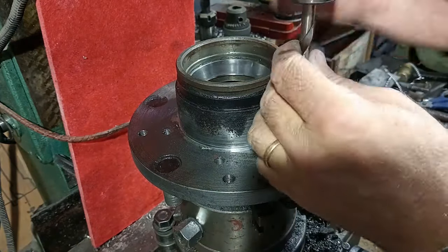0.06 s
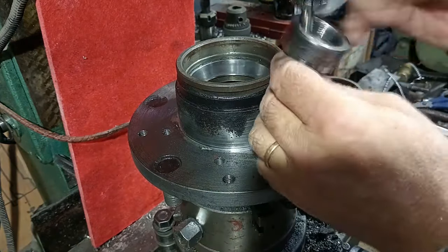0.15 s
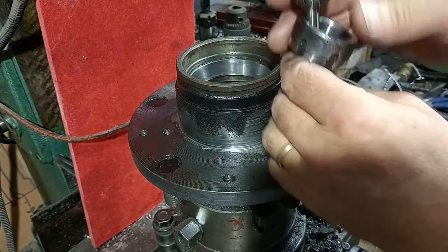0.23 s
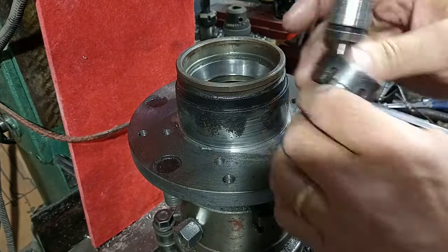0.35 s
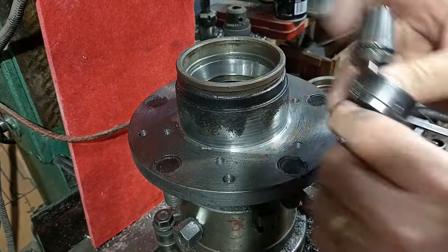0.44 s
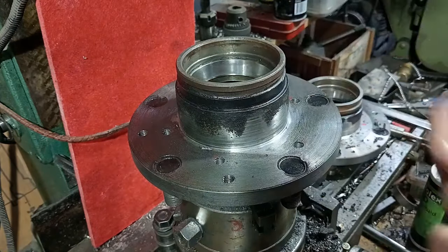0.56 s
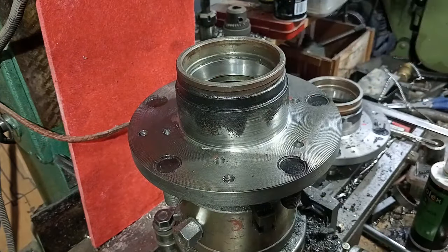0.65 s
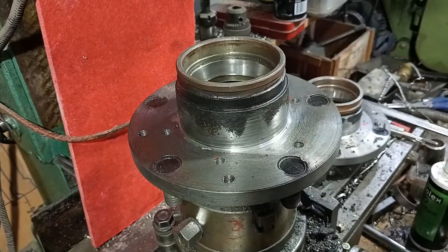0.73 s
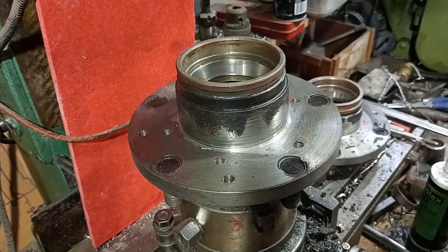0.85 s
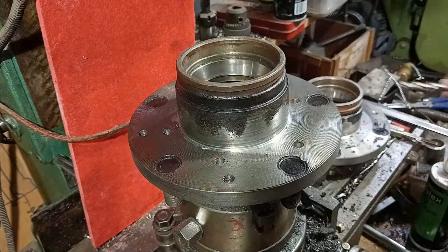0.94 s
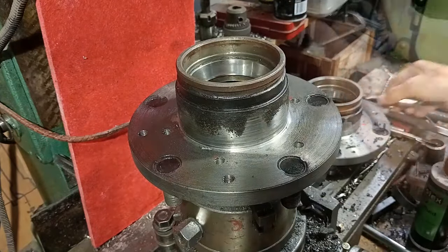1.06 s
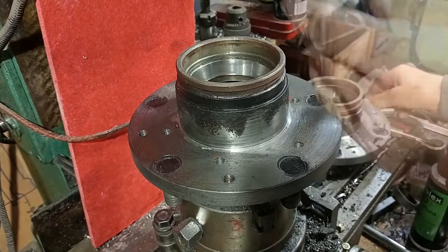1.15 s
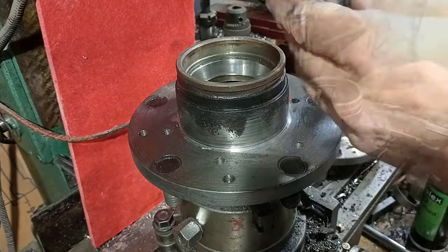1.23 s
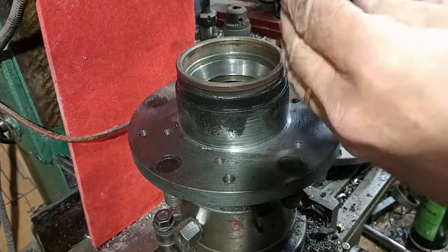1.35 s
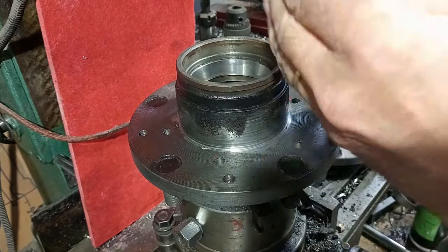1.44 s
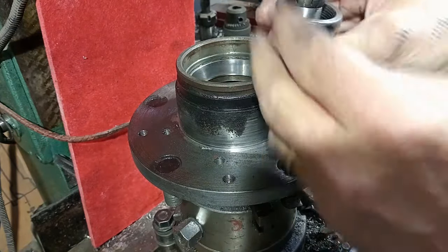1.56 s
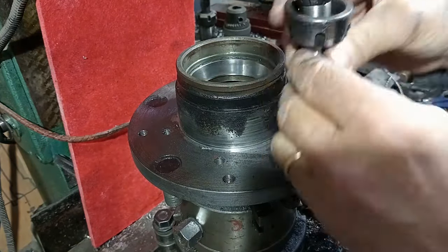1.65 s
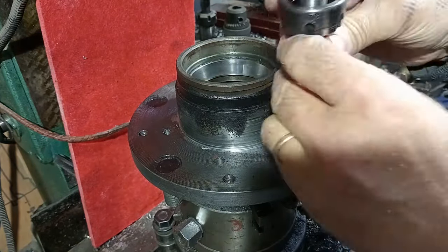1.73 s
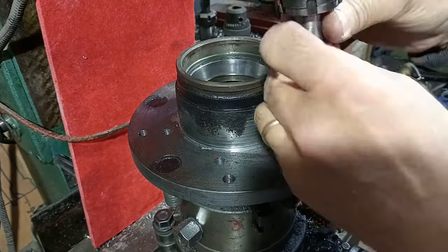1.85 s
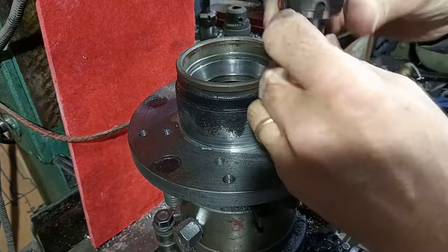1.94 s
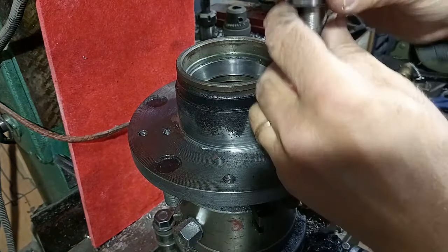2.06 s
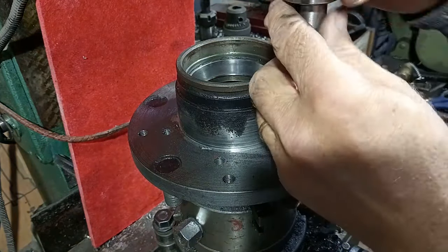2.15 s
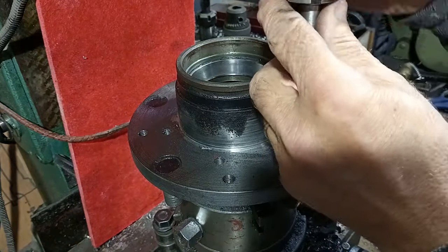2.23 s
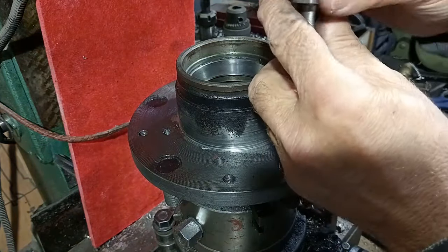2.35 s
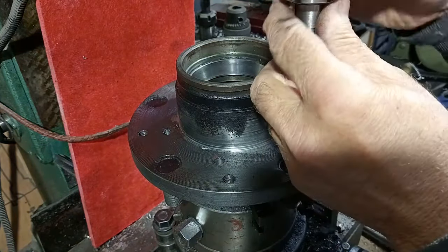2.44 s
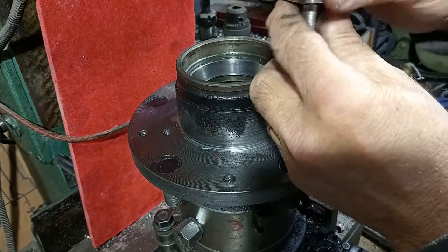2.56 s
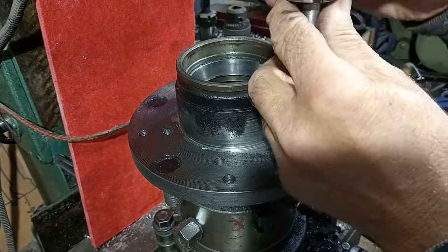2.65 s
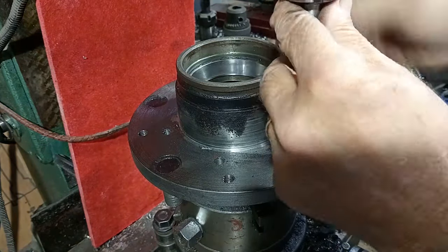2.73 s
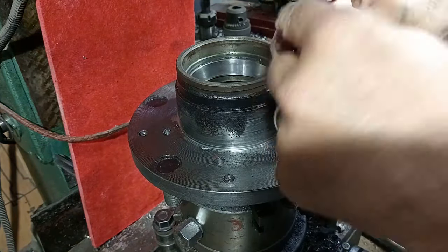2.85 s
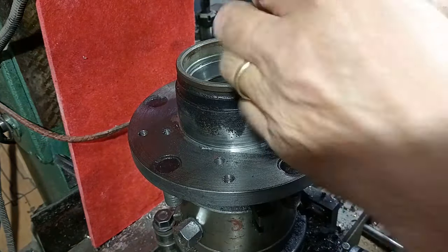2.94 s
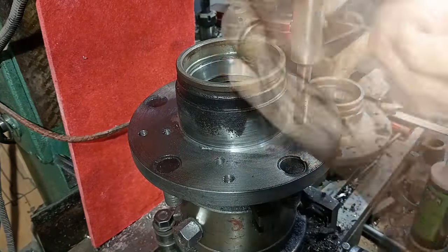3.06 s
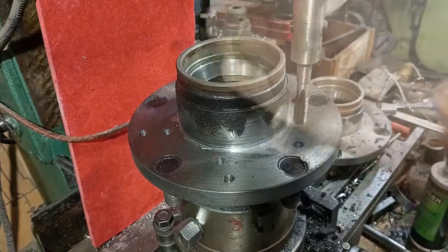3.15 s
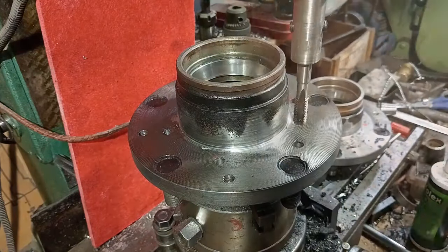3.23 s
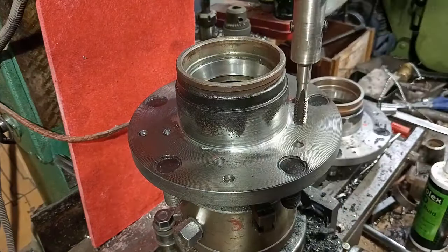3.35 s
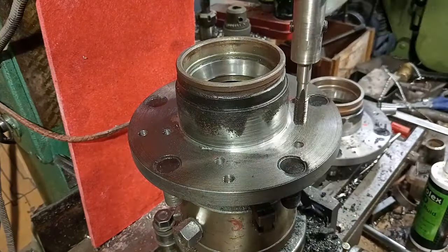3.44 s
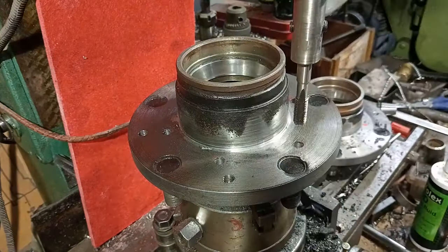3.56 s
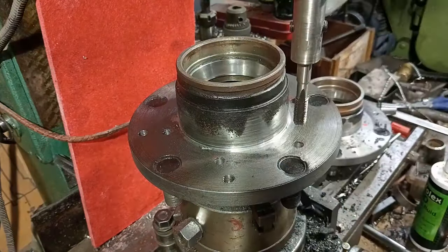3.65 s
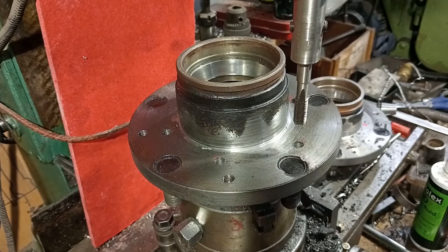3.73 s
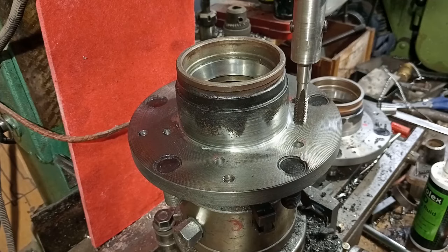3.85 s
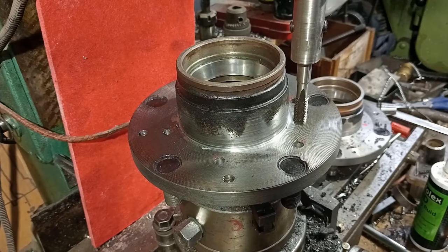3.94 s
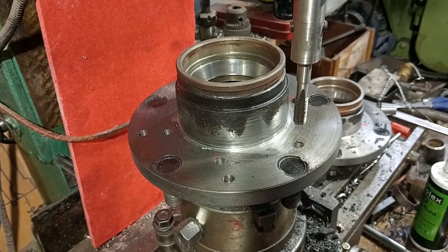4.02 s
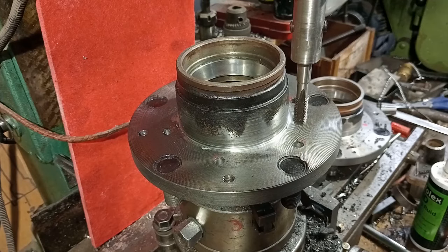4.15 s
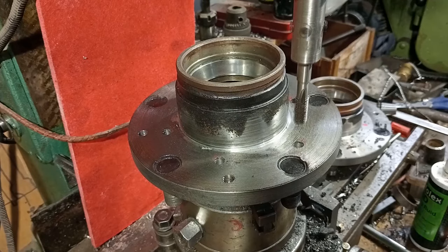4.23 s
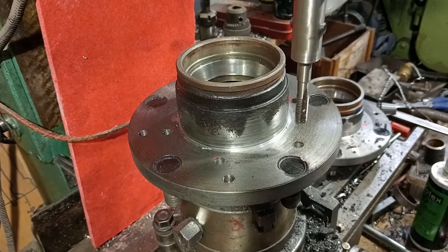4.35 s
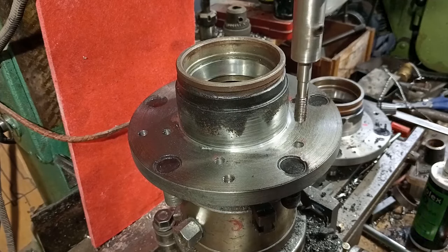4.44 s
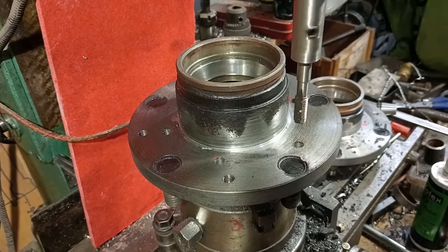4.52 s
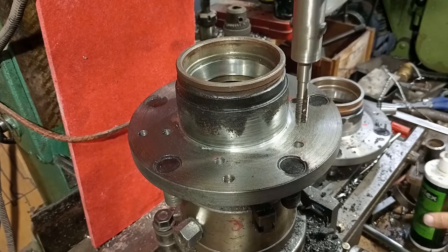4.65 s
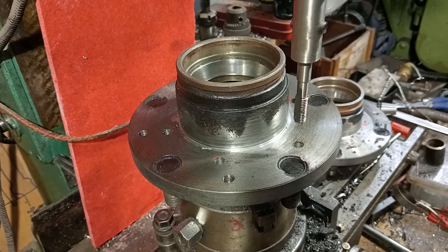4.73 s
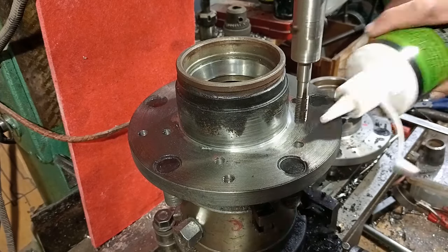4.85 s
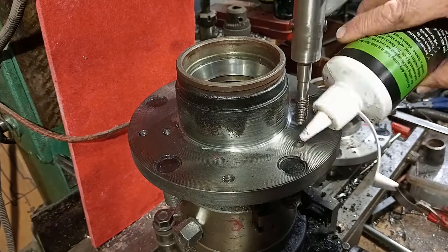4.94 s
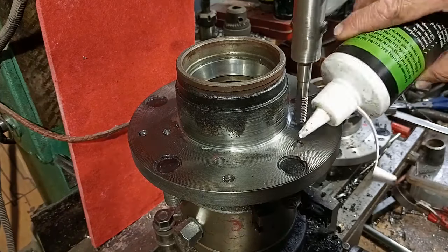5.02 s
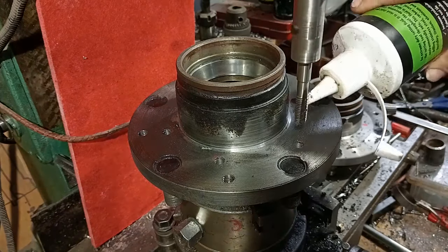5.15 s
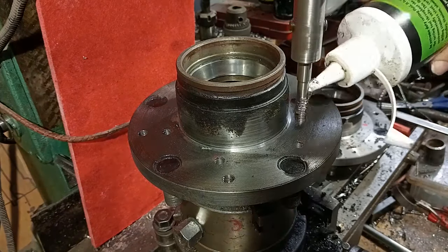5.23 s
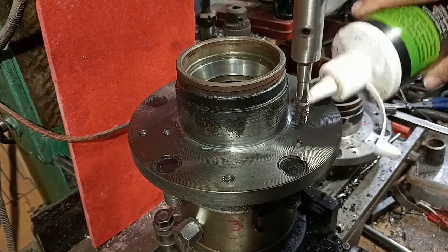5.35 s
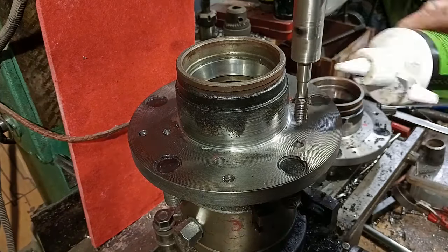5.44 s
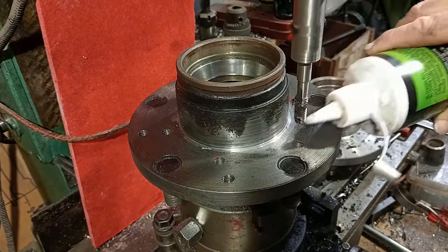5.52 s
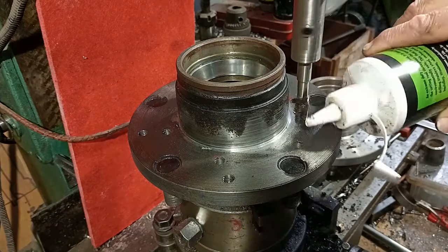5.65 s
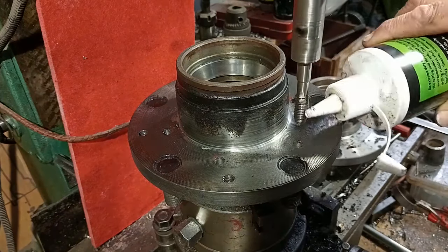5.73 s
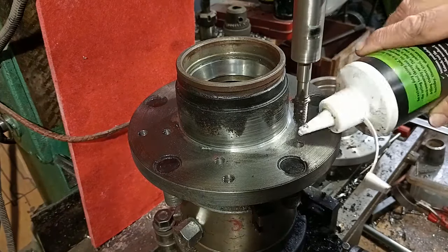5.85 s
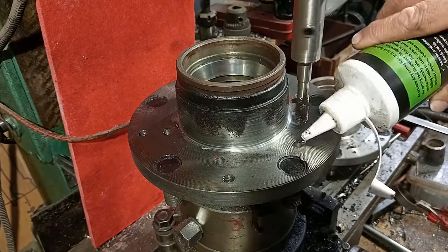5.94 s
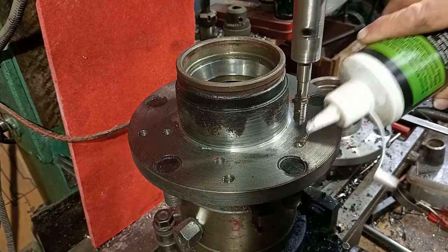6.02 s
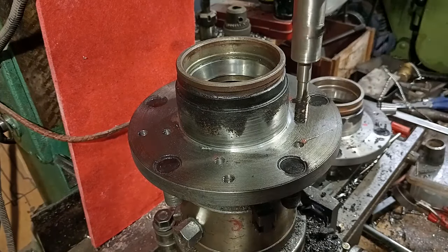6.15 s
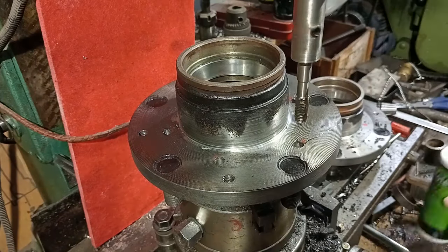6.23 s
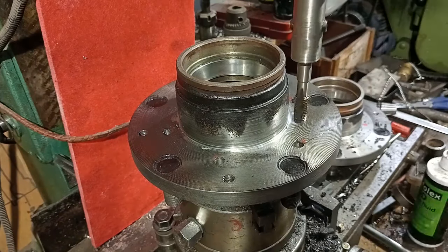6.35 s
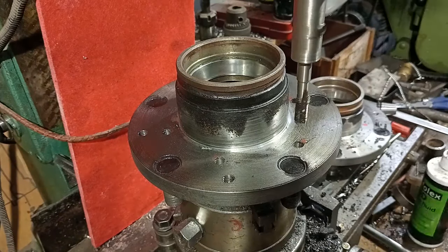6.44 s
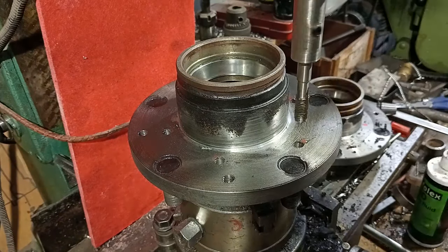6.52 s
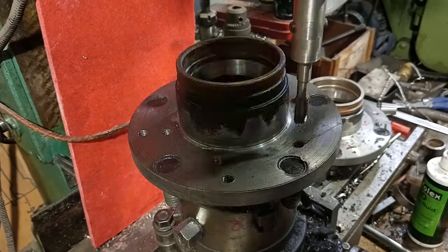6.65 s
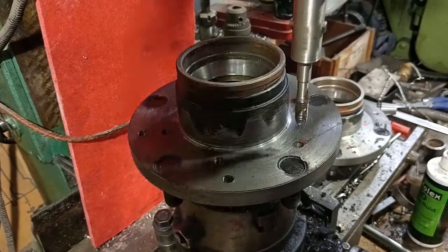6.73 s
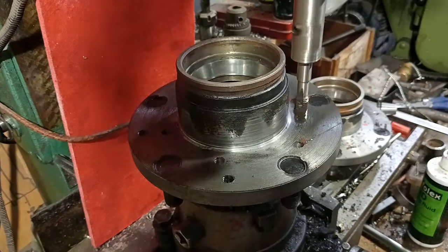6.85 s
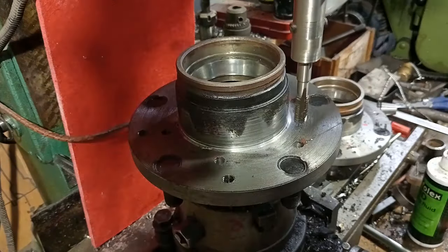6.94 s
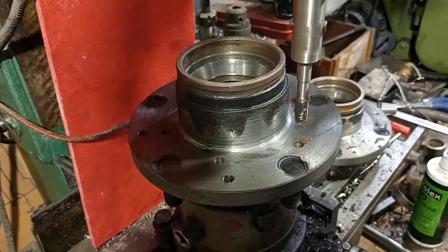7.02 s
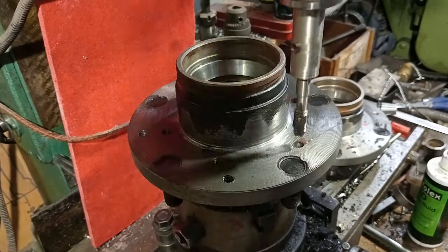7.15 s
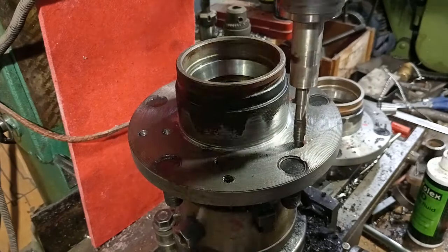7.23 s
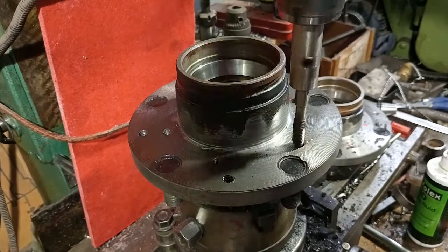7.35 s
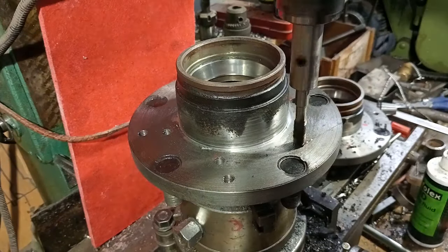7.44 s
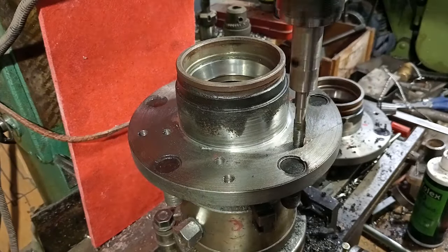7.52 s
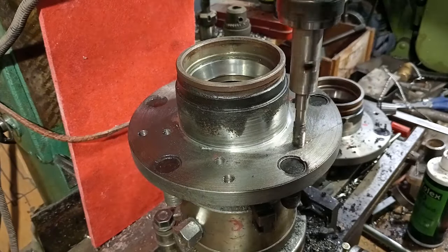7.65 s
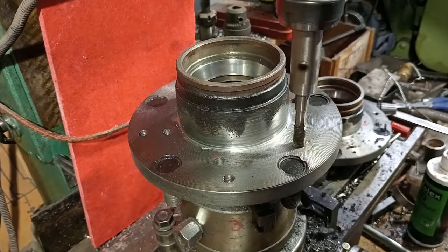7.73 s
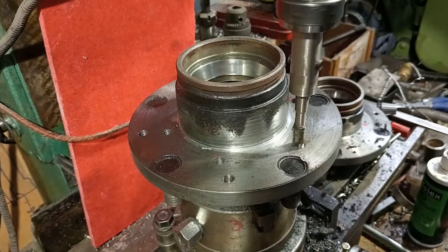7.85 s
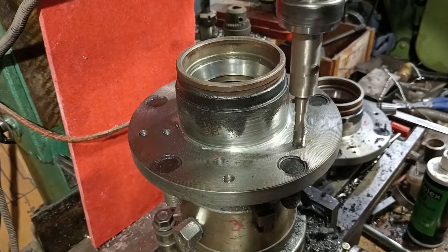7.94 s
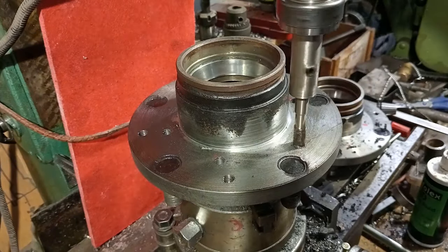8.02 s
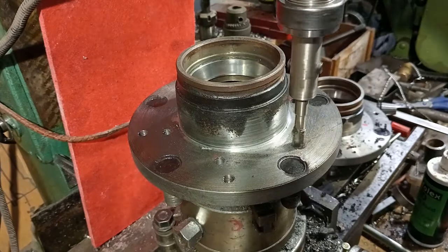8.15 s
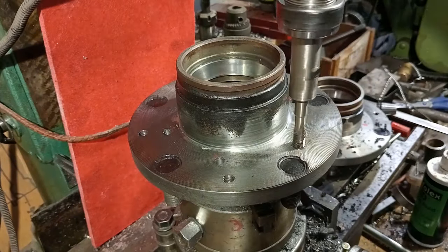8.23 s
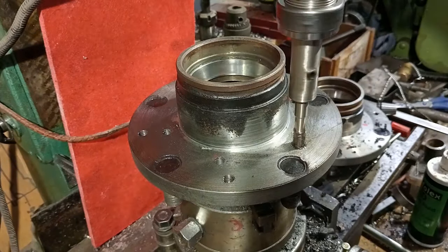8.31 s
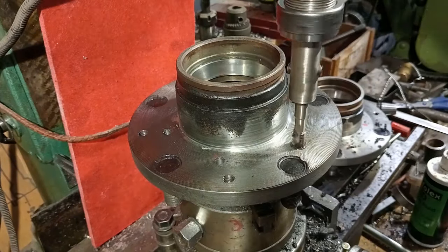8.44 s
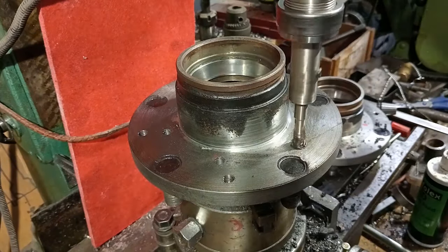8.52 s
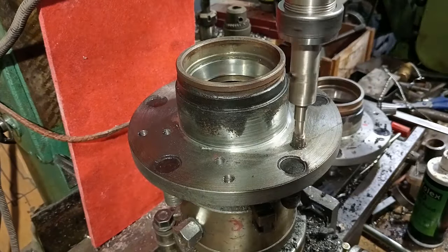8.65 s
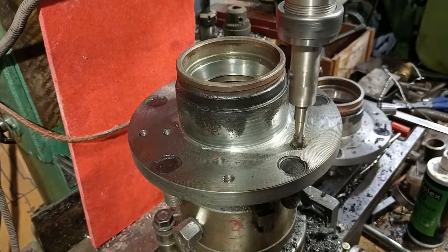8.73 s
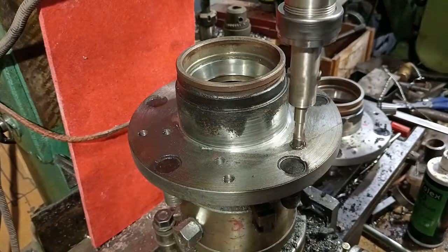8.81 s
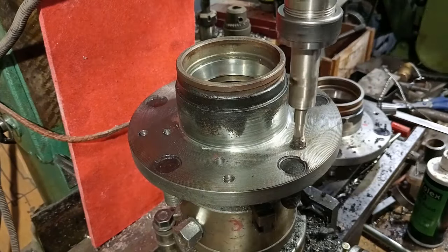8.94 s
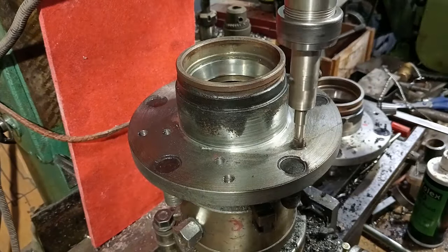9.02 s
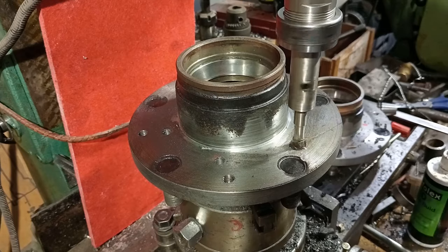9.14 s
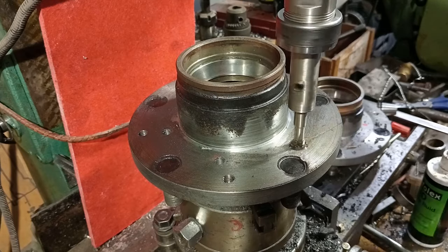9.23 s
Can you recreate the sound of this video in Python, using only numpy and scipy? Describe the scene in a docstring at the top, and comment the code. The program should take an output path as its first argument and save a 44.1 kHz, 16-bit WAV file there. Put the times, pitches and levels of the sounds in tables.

```python
"""A mill-drill motor runs: mains hum, a rattle twice a mains cycle, gear tones and a high whine in housing hiss.
Lowering the quill changes the colour; then the tap bites and the speed sags a little.
Before that, hands fit the tap: steel parts click, the bench is bumped, fingers and sleeves rustle.
A contactor snaps between the two. Tones, bumps and the holder's ring are sines; the rest is mostly
shaped noise or pulses. Clicks, bumps and short narrow-band sounds leave a diffuse tail in the shop."""
import sys
import numpy as np
from scipy import signal
from scipy.io import wavfile
from scipy.ndimage import uniform_filter1d

SR = 44100
rng = np.random.default_rng(int(sys.argv[2]) if len(sys.argv) > 2 else 0)


def convert_level_to_amplitude(level_db):
    """Map a level in decibels to its linear amplitude factor."""
    exponent = np.asarray(level_db, float) / 20
    return 10 ** exponent


def int16_out(signal):
    """Quantize to a 16-bit WAV file."""
    q = np.round(np.clip(np.atleast_2d(signal).T, -1, 1) * 32767)
    wavfile.write(sys.argv[1], SR, q.astype(np.int16))


N = 409248

# Work stage, 0 quill up - 1 quill lowered - 2 cutting: t/s, stage
WORK_STAGE = [(6.66, 0.0046), (6.83, 0.3), (7.17, 1), (7.78, 1), (7.81, 2)]
# The contact closes, lets go once around the bounce, then holds
SWITCH_S, BOUNCE_S, BOUNCE_WIDTH_S, BOUNCE_DB = 4.345, 4.367, 0.011, -15
START = round(SWITCH_S * SR)

# In the tables below, "x3" is one column each for quill up, lowered, cutting.
MAINS_HZ = 50
# Hum partials: f/multiple of mains, level/dB x3
HUM_PARTIALS = [(8, -39, -39.5, -42), (8.45, -61, -61, -66), (10, -57, -57, -60), (16, -61, -60, -59),
                (22, -60, -60, -65), (24, -60, -59, -65), (26, -57, -57, -62), (28, -52, -52, -62),
                (30, -56, -56, -62), (32, -53, -55, -60)]
RATTLE_DB, HOUSING_DB = (-35.5, -36, -39.5), (-31, -31, -32.5)
BUZZ_SHARE, KNOCK_STRENGTH = (0.43, 0.58, 0.62), (0.28, 0.26, 0.78)
KNOCK_S, TURN_S = 8.151, .0455  # time of one knock, and the spacing of all
SAG = .0032  # share of speed lost in the cut
# Gearbox resonances: f/Hz, width/Hz (before body() widens it), relative level/dB x3
GEARBOX_MODES = [(748, 140, -16, -11, -7), (1126, 210, -12.5, -8, -11.5), (1405, 64, -4, -1.5, -5),
                 (1575, 76, -7, -2, -2.5), (1742, 83, 3, 7, -0.5), (1999, 118, -1, 6.5, 4),
                 (2300, 160, -2.5, 5, -1.5), (2700, 280, 0.5, 4.5, -1)]
# Housing resonances, same columns
HOUSING_MODES = [(3450, 500, -16, -15, -12), (4130, 200, -8, -10, -7), (4650, 170, -6, -10, -10),
                 (5000, 300, -3, -11, -11), (5250, 130, -13, -7, -9), (5800, 250, -8, -3, -5),
                 (6250, 280, 1, 0, -2), (6800, 300, -9, -12, -11), (7500, 300, -10, -9, -13),
                 (8050, 400, -5, -6, -7), (9000, 500, -14, -15, -16), (10150, 350, -10, -11, -9),
                 (10650, 400, -7, -11, -6), (11400, 350, -10, -11, -10), (12050, 450, -1, 0, -2),
                 (12650, 400, -5, -5, -7), (13250, 500, -1, -1, 0), (13950, 500, -8, -3, -7),
                 (14530, 500, -8, -3, -1), (15200, 550, -1, -3, -3), (15600, 400, -10, -9, -6)]
# Swells and slackenings of the running gear: middle t/s, width/s, rattle level/dB, share felt in the hiss
GEAR_SURGES = [(4.388, 0.03, 3.5, 0.95), (4.68, 0.24, -3.5, -0.15), (6.4, 0.18, -3.5, 0.002),
               (6.95, 0.12, 2.5, 0.34), (7.3, 0.41, 1.5, 0.3), (7.725, 0.013, 4.5, 0.86),
               (7.771, 0.013, 5.5, 1)]
# Gear mesh comb with sidebands: f/multiple of mesh, sideband number, level/dB x3
MESH_HZ, MESH_SIDE_HZ = 583.73, 99.4  # at free speed
MESH_TONES = [(6, 0, -57, -60, -66), (7, -1, -49, -61, -55), (7, 0, -46, -44, -46), (8, -1, -43, -59, -58),
              (8, 0, -46, -43, -47), (9, -1, -46, -50, -54), (9, 0, -53, -46, -53), (9, 1, -59, -47, -48),
              (10, -1, -51, -48, -51), (10, 1, -60, -49, -54), (10, 2, -57, -52, -57),
              (11, -1, -54, -46, -44)]
# High whine, evenly stepped around its centre: steps, sideband number, level/dB x3
WHINE_HZ, WHINE_STEP_HZ, WHINE_SIDE_HZ = 13274.9, 632.8, 115.7  # at free speed
WHINE_TONES = [(-2, 0, -43, -41, -46), (-2, 1, -51, -55, -54), (-2, 2, -51, -49, -50),
               (-1, -2, -52, -52, -56), (-1, 0, -43, -44, -46), (0, -2, -49, -45, -52),
               (0, 0, -42, -43, -43), (0, 1, -50, -52, -51), (1, 0, -51, -49, -53), (2, 0, -52, -50, -47)]
# Further single tones that follow the shaft speed: f/Hz at free speed, level/dB x3
SINGLE_TONES = [(3778, -55, -60, -58), (4611.6, -51, -57, -69), (4916.4, -51, -64, -62),
                (5285.9, -62, -51, -52), (5779, -66, -52, -57), (6185, -50, -56, -60),
                (6281.6, -58, -52, -53), (6480.2, -52, -56, -70), (7929.9, -45, -45, -52),
                (12584.6, -52, -53, -55), (14573.7, -59, -53, -50)]
TRAVEL_TONES_DB, TRAVEL_HISS_DB = -6, -2  # tones and hiss thin out while the quill travels
# The quill sliding in its bore: f/Hz, level/dB
QUILL_SLIDE = [(6000, -53), (6800, -45), (7800, -43)]
# Colour of the low rumble: f/Hz, relative level/dB per Hz
RUMBLE_COLOUR = [(12, -47), (43, -3), (86, -15.5), (145, -13), (338, -2), (364, -52), (398, -36), (455, 8),
                 (700, -4.5), (910, -67)]
RUMBLE_DB = (-62, -62, -63)

# Steel on steel, the contactor, last the tap meeting the hole:
# t/s, level/dB, centre f/Hz, lower body/dB against the crack
STEEL_CLICKS = [(0.0176, -25.5, 5140, -7), (0.1334, -24.5, 4500, -9), (0.1375, -29.5, 6460, -1),
                (0.1725, -19.5, 6240, -24.5), (0.1775, -33, 7450, -16.5), (0.1934, -32, 7500, -23),
                (0.1987, -27, 6000, -7), (0.209, -36, 6000, -21), (0.2186, -20.5, 6260, -21.5),
                (0.2235, -10.5, 11540, -11), (0.238, -26, 6200, -27.5), (0.267, -23.5, 6200, -33.5),
                (0.2857, -40, 5000, 7), (0.3345, -22, 5950, -12), (0.5675, -36, 9800, -28),
                (0.5853, -37, 9400, -30), (0.818, -26, 9000, -59), (0.842, -33, 8550, -10.5),
                (1.201, -60, 4000, -14), (1.2232, -38, 8000, -22), (1.2282, -30, 7700, -7.5),
                (1.295, -60, 8000, -25), (1.345, -42, 7250, -17), (1.3557, -26, 6200, -9),
                (1.36, -32.5, 2010, -1), (1.403, -44, 7000, -10), (1.4097, -27.5, 5170, -12),
                (1.502, -42, 12000, -20), (1.5463, -41.5, 6630, -3), (1.573, -29.5, 6160, -14),
                (1.6444, -32.5, 6000, -11), (1.685, -48, 4500, -1), (1.74, -33, 5560, -7),
                (1.8063, -36, 8800, -12), (1.876, -47, 5600, -7), (1.96, -56, 6000, -11.5),
                (2.0066, -29, 6160, -17), (2.0293, -32, 5320, -1.5), (2.0447, -22.5, 6000, -9),
                (2.126, -39, 5980, -26), (2.141, -22.5, 5370, -36), (2.145, -18.5, 5760, -8),
                (2.1641, -43, 1780, 10), (2.2863, -18.5, 6600, -15), (2.387, -50, 12000, -20),
                (2.5385, -52.5, 5640, -3), (2.575, -63, 1275, -4), (2.945, -56, 3930, -12),
                (3.041, -54, 3000, 5), (3.0729, -53, 5360, -14), (3.136, -44, 4670, -20),
                (3.1682, -53, 6010, -42), (3.2907, -40, 4500, -22), (3.6497, -43.5, 2850, 0),
                (4.33, -42.5, 6000, -8), (4.334, -23, 12000, -13), (4.348, -22, 2720, -10),
                (4.3759, -13.5, 11000, -13), (4.385, -20, 2460, -6), (7.731, -15, 9000, -20)]
# Ring of the tap holder before each grip detunes and damps it: f/Hz, level/dB, t60/s
HOLDER_MODES = [(2110, -20, 0.035), (3024, -14, 0.025), (3720, -14, 0.022), (5730, -17, 0.014),
                (6300, -15, 0.014), (7110, -3, 0.014), (8700, -5, 0.016)]
# Short narrow-band sounds: scrapes, dull rings, a brush, a blip of hum at the switch:
# t/s, length/s, level/dB, starting f/Hz, width/Hz
NARROW_SOUNDS = [(0.133, 0.085, -52, 1034, 90), (0.264, 0.091, -56.5, 1037, 90),
                 (1.052, 0.16, -76.5, 1380, 160), (2.202, 0.08, -65.5, 9300, 1200),
                 (2.233, 0.23, -66.5, 1433, 200), (2.672, 0.026, -52, 900, 1190),
                 (2.72, 0.058, -66, 2720, 494), (2.917, 0.036, -63, 1000, 900),
                 (2.988, 0.036, -65, 1200, 1500), (3.357, 0.039, -59, 1285, 900),
                 (3.913, 0.048, -61.5, 4330, 600), (3.914, 0.049, -68, 2650, 400),
                 (4.313, 0.024, -69, 4640, 120), (4.33, 0.038, -42, 2800, 150),
                 (4.349, 0.02, -44.5, 396, 40), (6.302, 0.019, -44.5, 645, 497)]
GLIDE_PER_S = 0.56  # share of their pitch lost per second
# Dull bumps on bench and machine: t/s, level/dB, starting f/Hz, t60/s
DULL_BUMPS = [(0.224, -29.5, 231, 0.014), (0.948, -43.5, 337, 0.017), (2.208, -49, 368, 0.051),
              (2.225, -39, 410, 0.036), (2.774, -38.5, 338, 0.018), (3.307, -31, 270, 0.032),
              (3.328, -34, 227, 0.051), (3.348, -33.5, 236, 0.05), (3.306, -43, 136, 0.22),
              (3.926, -48.5, 207, 0.044)]
# Fingers fumbling with the parts: t/s, length/s, level/dB, grit/dB against the dull shuffle
FINGER_FUMBLES = [(0, 0.023, -52, 0), (0.124, 0.23, -54, 3.5), (0.574, 0.36, -63, -1),
                  (1.341, 0.19, -57.5, 0.5), (1.542, 0.3, -62.5, -1.5), (1.772, 0.046, -61.5, -8),
                  (1.879, 0.048, -65, 1.5), (2.0, 0.27, -58, -2), (2.13, 0.29, -59.5, -6),
                  (2.452, 0.021, -65.5, 0.5), (2.57, 0.16, -71.5, -5), (2.714, 0.051, -60, -4),
                  (2.805, 0.3, -65.5, -3), (3.127, 0.14, -69.5, 2), (3.287, 0.25, -61, -2.5),
                  (3.627, 0.32, -69.5, -1.5), (3.906, 0.047, -58, -5), (3.988, 0.26, -68.5, -2.5)]
GRAB_S, TIRE_DB_PER_S, LET_GO_DB_PER_S = 0.0081, 30.5, 158.5  # letting go adds to tiring
# Cloth brushing past, a soft swell of fine hiss: t/s, length/s, level/dB
CLOTH_BRUSHES = [(0, 0.075, -58.5), (0.096, 0.26, -63), (0.572, 0.3, -62.5), (1.345, 0.36, -64.5),
                 (1.995, 0.37, -69), (2.72, 0.33, -69.5), (3.238, 0.32, -64.5), (3.906, 0.078, -67)]
BRUSH_RISE_SHARE, BRUSH_DEPTH_DB = 0.19, 13.5
# Colour of the dull shuffle: f/Hz, relative level/dB per Hz
SHUFFLE_COLOUR = [(35, -63), (60, -20.5), (289, 1), (388, -4), (784, -5), (1120, -9.5), (3000, -24.5),
                  (3900, -48), (6600, -120)]
# Colour of the gritty rub, same columns
RUB_COLOUR = [(590, -32), (1000, -8.5), (1630, -9), (2130, -12.5), (2510, -9.5), (8000, -16),
              (10400, -51.5), (17600, -120)]
# Colour of the fine cloth hiss, same columns
HISS_COLOUR = [(3820, -30), (6500, -5), (8000, -6), (9090, 4), (10200, -2), (11500, -6), (12800, -5),
               (14900, -7.5), (16000, -7.5)]
STILL_SHUFFLE_DB, STILL_RUB_DB, STILL_HISS_DB = -79.5, -82, -84.5  # the shop when nothing moves


def evened(x):
    """Scales to rms 1."""
    return x / np.sqrt(np.mean(x ** 2) + 1e-20)


def by_stage(values):
    """Blends three values as the work stage moves on, one result a sample from the switch on."""
    s, stage = np.transpose(WORK_STAGE)
    return np.interp(np.interp(np.arange(START, N) / SR, s, stage), range(3), values)


def staged(db):
    """Gain that blends three dB values as the work stage moves on."""
    return convert_level_to_amplitude(by_stage(db))


def add(mix, s, sound):
    """Mixes a sound in at time s."""
    part = mix[round(s * SR):][:len(sound)]
    part += sound[:len(part)]


def resonate(x, hz, width, count=1):
    """Two-pole band-pass, steeper when repeated."""
    for _ in range(count):
        x = signal.lfilter(*signal.iirpeak(min(hz, SR / 2.2), hz / width, SR), x)
    return x


def wander(size, hz):
    """Slow chance of rms 1, up to about hz."""
    step = int(SR / hz)
    held = np.repeat(rng.standard_normal(size // step + 1), step)[:size]
    return evened(uniform_filter1d(held, step))


def noise(colour, patchy_db):
    """Random short-time spectra of a given colour, in drifting patches, at rms 1."""
    hz = np.fft.rfftfreq(1024, 1 / SR)
    f, db = np.transpose(colour)
    real, imaginary, patches = rng.standard_normal((N // 256 + 5, 513, 3)).T
    patches = evened(uniform_filter1d(uniform_filter1d(patches, 10, 0), 6, 1))
    colour_db = np.interp(np.log(hz + 1), np.log(f + 1), db)[:, None]
    spectra = (real + 1j * imaginary) * convert_level_to_amplitude(colour_db + patchy_db * patches)
    return evened(signal.istft(spectra, nperseg=1024, noverlap=768)[1][:N])


def body(drive, modes, patchy_db, apart=0):
    """The drive rings wavering resonances, shifted by apart samples from one to the next.
    Their gains are balanced to unit power in every stage."""
    gains = np.array([staged(db) for _, _, *db in modes])
    gains /= np.sqrt((gains ** 2).sum(0))
    out = 0
    for k, ((hz, width, *_), gain) in enumerate(zip(modes, gains)):
        waver = convert_level_to_amplitude(patchy_db * wander(len(drive), hz=50))
        ring = evened(resonate(np.roll(drive, k * apart), hz, 1.5 * width, count=2))
        out = out + (-1) ** k * gain * waver * ring  # alternate signs between neighbours
    return out


def motor():
    """Hum locked to the mains; rattle, tones and hiss from the turning parts."""
    size = N - START
    t = np.arange(size) / SR
    stage = by_stage(range(3))
    cutting = np.clip(stage - 1, 0, 1)
    travel = np.sin(np.pi * np.clip(stage, 0, 1))  # 1 midway through the quill's travel
    turns = np.cumsum(1 - SAG * cutting + .0001 * wander(size, hz=4)) / SR  # time at free speed
    rattle_db, hiss_db = motor_levels(t)
    engaged = np.clip((t - .028) / 0.005, 0, 1)  # the hum takes hold at the second contact
    tonal = mains_hum(t) + convert_level_to_amplitude(TRAVEL_TONES_DB * travel) * turning_tones(turns)
    sound = np.sqrt(2) * engaged * tonal
    sound += convert_level_to_amplitude(rattle_db) * rattle(t)
    sound += convert_level_to_amplitude(hiss_db + TRAVEL_HISS_DB * travel) * housing_hiss(t, turns)
    sound += travel * quill_slide(size)
    sound += staged(RUMBLE_DB) * noise(RUMBLE_COLOUR, patchy_db=1.5)[:size]
    return np.concatenate([np.zeros(START), np.clip(t / 0.0037, 0, 1) * sound])


def motor_levels(t):
    """Rattle and hiss dB: a level for each stage, slow surges, and the gap while the contact bounces."""
    s = t + SWITCH_S
    gap_db = BOUNCE_DB * np.exp(-((s - BOUNCE_S) / BOUNCE_WIDTH_S) ** 2)
    rattle_db = by_stage(RATTLE_DB) + 0.091 * gap_db
    hiss_db = by_stage(HOUSING_DB) + gap_db
    for middle, width, db, share in GEAR_SURGES:
        swell = db * np.exp(-((s - middle) / width) ** 2)
        rattle_db = rattle_db + swell
        hiss_db = hiss_db + share * swell
    return rattle_db, hiss_db


def mains_hum(t):
    """Steady sines tied to the mains frequency, not to the speed of the motor."""
    return sum(staged(db) * np.sin(2 * np.pi * (k * MAINS_HZ * t + rng.random())) for k, *db in HUM_PARTIALS)


def rattle(t):
    """Loose gears buzz twice a mains cycle over finer chatter, and knock once a shaft turn."""
    size = len(t)
    beat = 2 * MAINS_HZ * t + .05 * wander(size, hz=30)
    taps = np.diff(np.maximum.accumulate(np.floor(beat)), prepend=0)  # one pulse a beat
    taps = taps * convert_level_to_amplitude(2.5 * wander(size, hz=70))
    puffs = np.exp(-(beat % 1) / 1.4) * rng.standard_normal(size)
    turn = (t + START / SR - KNOCK_S) / TURN_S % 1
    force = convert_level_to_amplitude(3 * np.clip(wander(size, hz=20), -2, 1))
    knocks = np.exp(-turn / 0.33) * force * rng.standard_normal(size)
    buzz = by_stage(BUZZ_SHARE)
    drive = buzz * (0.92 * evened(taps) + evened(puffs))
    drive += (1 - buzz) * rng.standard_normal(size)  # the finer chatter
    drive += by_stage(KNOCK_STRENGTH) * evened(knocks)
    drive *= convert_level_to_amplitude(1.5 * wander(size, hz=45))  # the play in the gears comes and goes
    drive /= np.sqrt(uniform_filter1d(drive ** 2, SR // 3))  # holds the slow level even
    return body(drive, GEARBOX_MODES, patchy_db=2.2)


def turning_tones(turns):
    """Gear mesh, whine and single sines follow the shaft speed, each wavering in level and phase."""
    tones = [(k * MESH_HZ + m * MESH_SIDE_HZ, *db) for k, m, *db in MESH_TONES]
    tones += [(WHINE_HZ + k * WHINE_STEP_HZ + m * WHINE_SIDE_HZ, *db) for k, m, *db in WHINE_TONES]
    tones += list(SINGLE_TONES)
    size, out = len(turns), 0
    for hz, *db in tones:
        waver = convert_level_to_amplitude(2.8 * wander(size, hz=40) - .7)
        cycles = hz * turns + rng.random() + .08 * wander(size, hz=30)
        out = out + staged(db) * waver * np.sin(2 * np.pi * cycles)
    return out


def housing_hiss(t, turns):
    """Noise throbbing with the mains rings the housing; a repeating mesh pattern adds faint tones."""
    throb = 1 + 0.32 * np.cos(4 * np.pi * MAINS_HZ * t) + 0.19 * np.cos(8 * np.pi * MAINS_HZ * t)
    pattern = rng.standard_normal(SR // 8)
    repeated = pattern[np.round(turns * SR).astype(int) % round(SR / 41.4)]  # 41.4 Hz at free speed
    drive = throb * rng.standard_normal(len(t)) + 0.7 * repeated
    return body(drive, HOUSING_MODES, patchy_db=1.5, apart=SR // MAINS_HZ * 3)


def quill_slide(size):
    """Friction noise in a few bands, from the quill sliding in its bore."""
    return sum(convert_level_to_amplitude(db) * evened(resonate(rng.standard_normal(size), hz, 455, count=2)) for hz, db in QUILL_SLIDE)


def clicks():
    """A few ms of chatter with its own colour, a duller body, and the holder's modes near that colour."""
    out, t = np.zeros(N), np.arange(SR // 5) / SR
    for s, db, hz, body_db in STEEL_CLICKS:
        hiss = rng.standard_normal(len(t))
        lumps = convert_level_to_amplitude(4 * wander(len(t), hz=700))
        snap = hiss * convert_level_to_amplitude(-60 * t / 0.006)  # the first touch
        chatter = lumps * convert_level_to_amplitude(-11.5 - 60 * t / 0.049) + convert_level_to_amplitude(-18.5 - 60 * t / 0.045)
        burst = snap + hiss * chatter
        sparkle_db = -10.5 + 19.0 * np.log2(hz / 6000)  # brighter clicks sparkle more
        crack = resonate(burst, hz, .5 * hz, count=2)
        crack += convert_level_to_amplitude(sparkle_db) * resonate(snap + 0.17 * burst, 11500, 8000)
        low = resonate(burst, 1350, 3000, count=2)
        ring = holder_ring(t, hz)
        add(out, s, convert_level_to_amplitude(db) * (crack / abs(crack).max() + convert_level_to_amplitude(body_db) * low / abs(low).max() + ring))
    return out


def holder_ring(t, hz):
    """Decaying sines, weaker away from the click's colour; each grip detunes and damps other modes."""
    out = np.zeros(len(t))
    for f, level, t60 in HOLDER_MODES:
        tune, damp_db = rng.uniform(.93, 1.07), rng.uniform(-14, 0)
        level_db = level + damp_db - 1.5 * abs(np.log2(f / hz))
        out += convert_level_to_amplitude(level_db - 60 * t / t60) * np.sin(2 * np.pi * f * tune * t)
    return out


def narrow_sounds():
    """Narrow-band noise around one falling pitch: scrapes, dull rings, a brush, a blip of hum."""
    out = np.zeros(N)
    for s, length, db, from_hz, width in NARROW_SOUNDS:
        size = round(length * SR)
        pole = np.exp(-np.pi * width / SR)
        grains = [1, 1j] @ rng.standard_normal((2, SR // 4))
        fuzz = signal.lfilter([1], np.poly([pole, pole]), grains)[-size:]
        glide = np.linspace(from_hz, from_hz * (1 - GLIDE_PER_S * length), size)
        tone = (fuzz * np.exp(2j * np.pi * np.cumsum(glide) / SR)).real  # shifts the fuzz up to the glide
        add(out, s, convert_level_to_amplitude(db) * evened(tone) * signal.windows.tukey(size, .4))
    return out


def bumps():
    """A few soft-edged cycles that sag in pitch."""
    out, t = np.zeros(N), np.arange(SR // 5) / SR
    for s, db, hz, t60 in DULL_BUMPS:
        shape = (1 - np.exp(-t / 0.0018)) * convert_level_to_amplitude(-60 * t / t60)
        add(out, s, convert_level_to_amplitude(db + 7.5) * shape * np.sin(2 * np.pi * hz * t * (1 - 3 * t)))
    return out


def hands():
    """Three noise textures of skin and cloth on metal: dull shuffle, grainy rub and fine hiss."""
    shuffle_gain, rub_gain = fumbling()
    shuffle = noise(SHUFFLE_COLOUR, patchy_db=1.5) * convert_level_to_amplitude(3 * wander(N, hz=50))
    rub = noise(RUB_COLOUR, patchy_db=2.2) * convert_level_to_amplitude(2.5 * wander(N, hz=70)) + rub_grains()
    hiss = noise(HISS_COLOUR, patchy_db=1.5)
    return shuffle_gain * shuffle + rub_gain * rub + brushing() * hiss


def rub_grains():
    """Faint random grains that roughen the rub: tiny noise bursts, about 70 a second, in one broad band."""
    hits = (rng.random(N) < 70 / SR) * convert_level_to_amplitude(4 * np.minimum(rng.exponential(1, N), 3))
    grain = rng.standard_normal(300) * convert_level_to_amplitude(-60 * np.arange(300) / SR / 0.0039)
    return 0.22 * evened(resonate(signal.oaconvolve(hits, grain)[:N], 4000, 6000, count=2))


def fumbling():
    """Each fumble grabs quickly, tires slowly and lets go: gains of shuffle and rub."""
    t = np.arange(N) / SR
    shuffle, rub = convert_level_to_amplitude(2 * STILL_SHUFFLE_DB), convert_level_to_amplitude(2 * STILL_RUB_DB)  # summed as powers
    for s, length, db, grit_db in FINGER_FUMBLES:
        age = np.maximum(t - s, 0)
        fall_db = TIRE_DB_PER_S * age + LET_GO_DB_PER_S * np.maximum(age - length, 0)
        power = np.minimum(age / GRAB_S, 1) ** 2 * convert_level_to_amplitude(2 * (db - fall_db))
        shuffle = shuffle + power
        rub = rub + power * convert_level_to_amplitude(2 * grit_db)
    return np.sqrt(shuffle), np.sqrt(rub)


def brushing():
    """Each brush swells early and fades towards its end: gain of the fine hiss."""
    t, power = np.arange(N) / SR, convert_level_to_amplitude(2 * STILL_HISS_DB)
    for s, length, db in CLOTH_BRUSHES:
        u = (t - s) / length
        away = np.maximum(1 - u / BRUSH_RISE_SHARE, (u - BRUSH_RISE_SHARE) / (1 - BRUSH_RISE_SHARE))
        power = power + convert_level_to_amplitude(2 * (db - BRUSH_DEPTH_DB * np.minimum(away, 10) ** 2))
    return np.sqrt(power)


def workshop(x):
    """Short diffuse tail of a crowded shop: convolution with decaying, band-passed noise."""
    t = np.arange(SR // 2) / SR
    tail = resonate(rng.standard_normal(len(t)), 2525, 6700) * convert_level_to_amplitude(-60 * t / 0.21) * (t > .006)
    return signal.oaconvolve(x, tail / np.linalg.norm(tail))[:N]


def scene():
    """The machine, the handling before it, and the shop's answer to the hits."""
    hits = clicks() + bumps() + narrow_sounds()
    hits = signal.lfilter(*signal.butter(2, 110, "high", fs=SR), hits)  # small parts give no deep bass
    return (motor() + hits + hands() + convert_level_to_amplitude(-17.5) * workshop(hits))[None]


def band_limit(x):
    """A steep low-pass at the top of the band."""
    return signal.sosfilt(signal.butter(12, 16830, fs=SR, output="sos"), x)


def record(dry):
    """Limits the band with a steep low-pass and finishes the mix."""
    edge = signal.firwin(1201, 15740, window=("kaiser", 7), fs=SR)
    mix = signal.oaconvolve(dry, edge[None], "same")
    return band_limit(mix)


dry = scene()
out = record(dry)
int16_out(out)
```